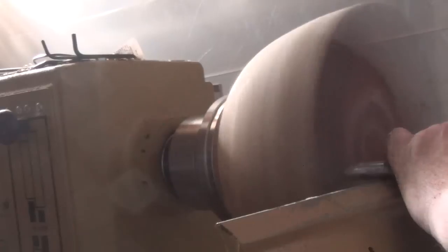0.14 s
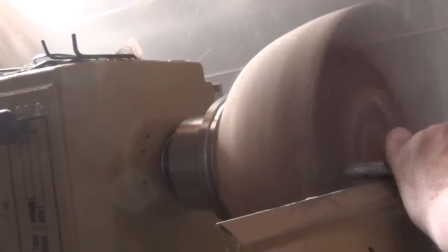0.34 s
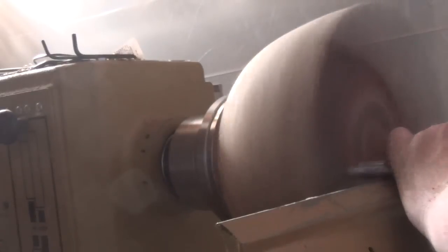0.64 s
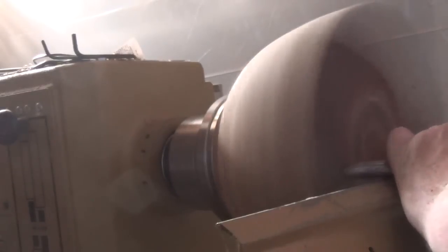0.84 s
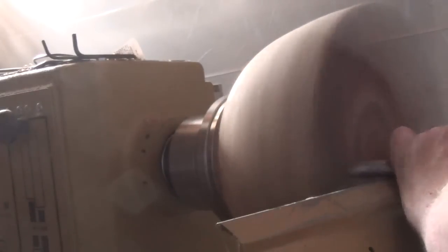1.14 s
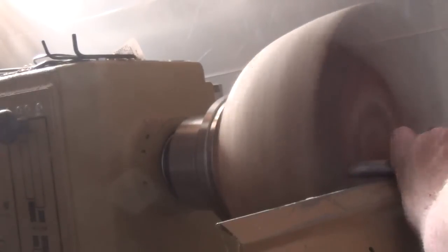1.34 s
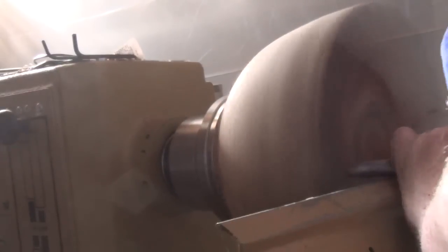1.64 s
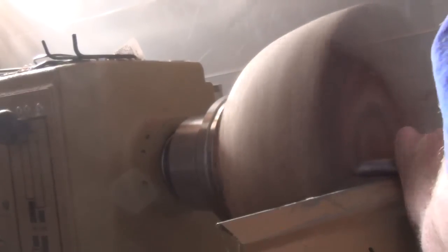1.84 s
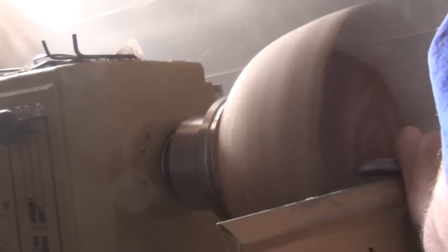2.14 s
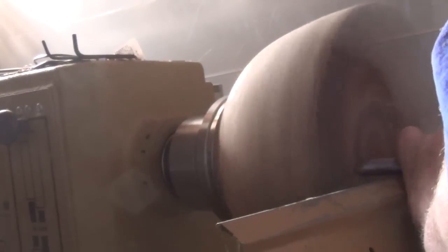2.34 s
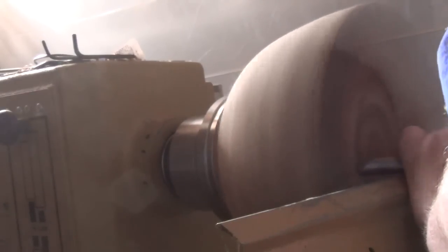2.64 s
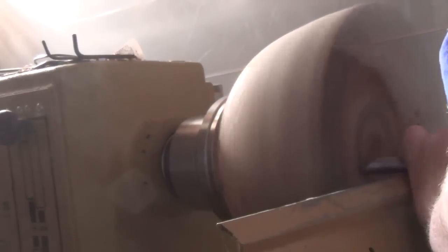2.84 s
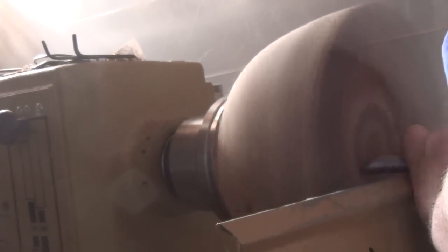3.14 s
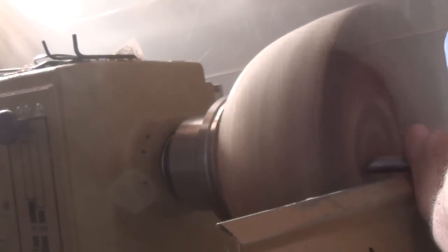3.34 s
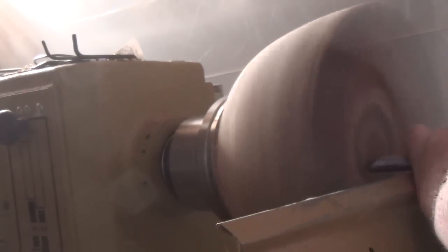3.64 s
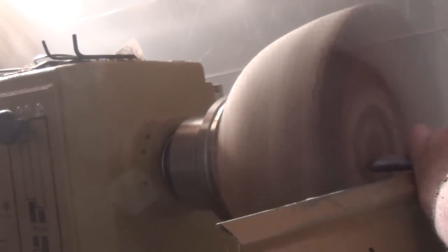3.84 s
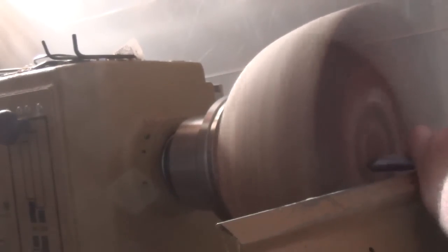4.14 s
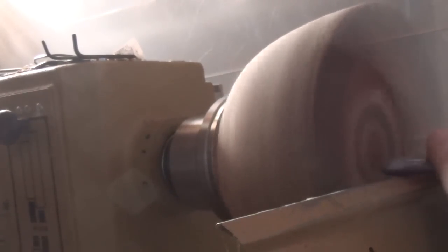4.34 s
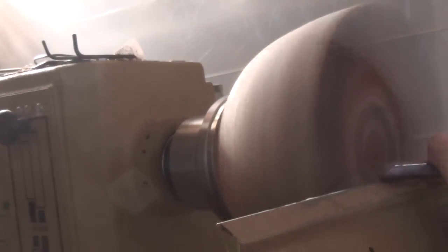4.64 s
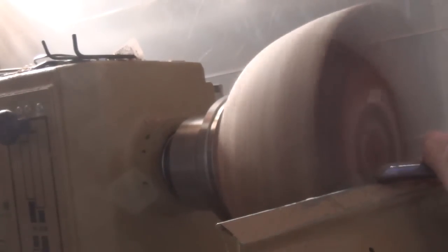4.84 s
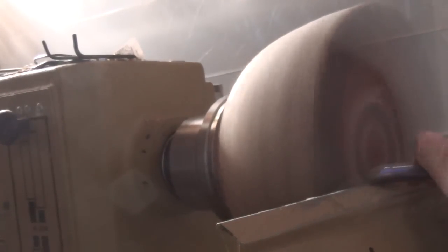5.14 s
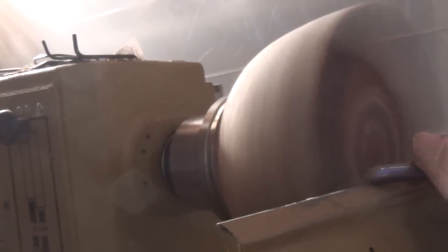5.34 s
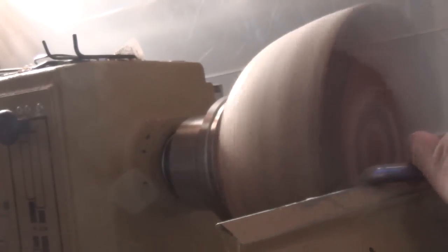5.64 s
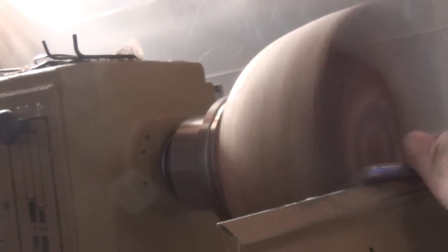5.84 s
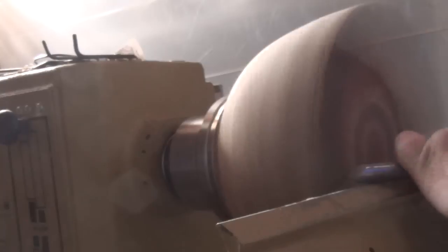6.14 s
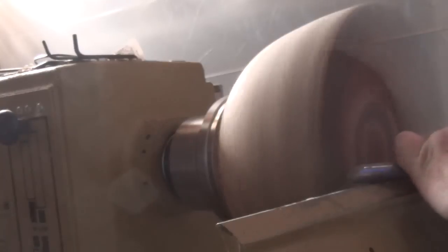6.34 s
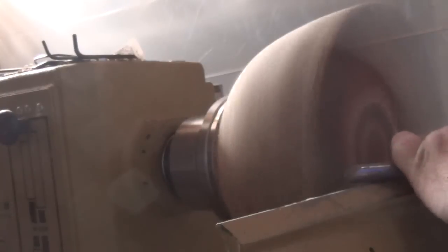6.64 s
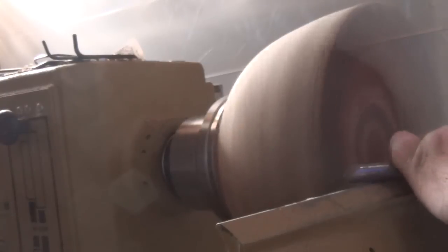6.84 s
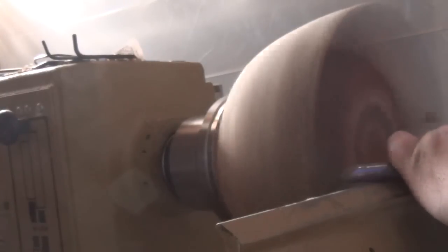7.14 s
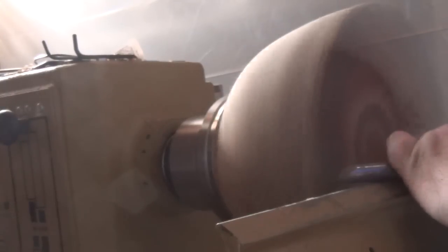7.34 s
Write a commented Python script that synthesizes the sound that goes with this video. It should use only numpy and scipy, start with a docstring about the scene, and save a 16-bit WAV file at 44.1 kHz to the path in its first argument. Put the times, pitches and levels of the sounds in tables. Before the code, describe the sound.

Fast rattling scrape of steel hollowing wood on a lathe, a pause of wavering motor hum and faint whine, then scraping again.

```python
"""A gouge hollows a wooden bowl on a lathe: twice a turn end grain bites the edge, each bite a click and a noisy tear.
Between bites shavings hiss, the bowl drums and a rumble runs below, mostly filtered noise; the tool rest buzzes,
shaken mainly by a jolt pattern that repeats each turn. After four seconds the tool lifts off and knocks lightly on
the rest, short noise bursts with a sine ring. The motor, low under the cut, is heard louder, wavering sine hum,
a comb of drive whine and noise for air, then the cut starts again."""
import sys
import numpy as np
from scipy import signal
from scipy.io import wavfile
from scipy.ndimage import uniform_filter1d

SR = 44100
rng = np.random.default_rng(int(sys.argv[2]) if len(sys.argv) > 2 else 0)


def put_to_file(sound):
    """Save the sound as 16-bit audio at rate SR, in the file named by the first command-line argument."""
    columns = np.atleast_2d(sound).T  # one column per channel
    safe = np.clip(columns, -1, 1)
    whole_steps = np.round(safe * 32767)
    wavfile.write(sys.argv[1], SR, whole_steps.astype(np.int16))


N = 329868


def gain_of(db):
    """Amplitude factor of a level in dB."""
    return 10 ** (np.asarray(db) / 20)


def unit_rms(x):
    """Scale to rms 1."""
    return x / np.sqrt(np.mean(x ** 2) + 1e-20)


def read(points, hz):
    """Read a (frequency_hz, value) table along a log frequency axis."""
    f, value = np.transpose(points)
    return np.interp(np.log(hz + 1), np.log(f + 1), value)


def curves(rows):
    """Columns of a timed table at every sample, and a soft-edged switch for where the table holds."""
    start_s, *columns = np.transpose(rows)
    t = np.arange(N) / SR
    on = 1. * (t >= start_s[0]) * (t <= start_s[-1])
    return [np.interp(t, start_s, c) for c in columns], uniform_filter1d(on, size=900)


def colour(x, db_at, size=8192):
    """Minimum-phase filter of power gain 1 from a dB shape; its peaks ring like modes."""
    hz = abs(np.fft.fftfreq(size, 1 / SR))
    log_gain = np.log(gain_of(np.maximum(db_at(hz), -100)))
    impulse = np.fft.ifft(np.exp(np.conj(signal.hilbert(log_gain)))).real[:size // 2]
    return signal.oaconvolve(x, impulse / np.linalg.norm(impulse))[:len(x)]


def band(x, lo_hz, hi_hz):
    """Butterworth band-pass."""
    return signal.sosfilt(signal.butter(2, [lo_hz, hi_hz], "band", fs=SR, output="sos"), x)


def slow(top_hz):
    """Slow random wander of rms 1: sixteen sines up to top_hz, the slower ones stronger."""
    t = np.arange(0, N, 256) / SR
    hz = top_hz * np.geomspace(.05, 1, num=16)[:, None]
    sines = np.sin(2 * np.pi * (hz * t + rng.random(hz.shape))) / np.sqrt(hz)
    return np.interp(np.arange(N) / SR, t, unit_rms(sines.sum(0)))


def fibres(per_s, spread_db, smooth):
    """Fibres snapping at random, a few of them large, over a smooth rubbing."""
    happens = rng.random(N) < per_s / SR
    size = gain_of(spread_db * np.minimum(rng.exponential(1, N), 4)) * happens
    snapping = unit_rms(size * rng.standard_normal(N))
    return unit_rms(snapping + smooth * rng.standard_normal(N))


def patches(shape, bins, frames):
    """Random field of rms 1, smoothed over frequency bins and time frames."""
    field = rng.standard_normal(shape[::-1]).T
    return unit_rms(uniform_filter1d(uniform_filter1d(field, size=bins, axis=0), size=frames, axis=1))


# single bites, mostly as the edge leaves and enters the wood; levels before later gains
# (start_s, level_db, length_ms, treble_share_db)
SINGLE_BITES = [(0.0876, -31, 19, 9), (0.335, -21, 14, 0.5), (2.023, -12, 6.9, 3.5), (2.339, -18, 9.8, 2.5),
                (2.446, -10, 8.4, -1.5), (2.55, -10.5, 5.2, -1), (3.009, -14, 8.4, 0.5),
                (3.042, -12, 5.9, 0), (3.182, -13, 16.6, -2), (3.575, -21, 4.6, -2),
                (3.6068, -12, 8.6, -1.5), (3.644, -18, 3.1, 2), (3.6746, -14, 11, -4),
                (3.6850, -21, 1.7, 1), (3.715, -18.5, 3.4, 3), (3.7455, -15, 6.4, -6),
                (3.7543, -11.5, 1.3, -3), (3.786, -12.5, 1.6, 2), (3.8156, -20, 16, -4),
                (3.823, -9, 1.45, -3), (3.888, -27, 15, -2), (3.894, -11, 2.5, -3),
                (3.958, -17.5, 7.8, 1.5), (3.963, -15.5, 3.6, -10), (4.0304, -13.5, 2, -1.5),
                (4.035, -10.5, 4.2, -8), (4.1, -15, 3, -1), (4.1055, -10.5, 2.2, -3), (4.169, -16, 5.4, -2),
                (6.343, -29.5, 2.1, 5), (6.4122, -23, 2.1, 13.5), (6.483, -18, 1.8, 7.5),
                (6.5082, -28, 2, 17), (6.5522, -13.5, 2.8, -4), (6.587, -25, 1.3, 15.5),
                (6.622, -13.5, 8.1, 1), (6.658, -16, 3, 4), (6.692, -13.5, 4.4, -1), (6.728, -21.5, 9, 4),
                (6.763, -15.5, 4.9, 1), (6.902, -17, 11, 0), (7.18, -25, 18, 10), (7.32, -13.5, 35, -5)]
# attack and decay of the bites over time; a fresh light pass snaps harder and trails off
# (start_s, snap_db, sag_db per bite length)
BITE_TOUCH = [(0, 17, 4.5), (2, 4.5, 6.5), (3.6, 7, 0.5), (4.2, 0, 2.5), (6.3, 6, 4), (6.7, 17, 20),
              (7.0, 18, 3), (7.48, 17, 13)]
SNAP_SPREAD_DB = 3  # scales the chance in each snap, less for short bites
BOWL_RISE_MS, BOWL_DB = 4.8, 1  # the bowl's low voice answers a bite late


def bites(rise_ms=0.3, fall_share=0.32, snap_ms=0.16):
    """Each bite opens with a dry snap, then tears, sags and lets go, while the bowl drums under it."""
    clumps = gain_of(2.6 * unit_rms(uniform_filter1d(rng.standard_normal(N), size=70)))  # chips break in clumps
    tearing = np.r_[clumps * fibres(9000, 2., .8), np.zeros(SR)]
    snapping = np.sign(rng.standard_normal(N + SR))
    tears, snaps = np.zeros((2, 2, N + SR))  # each has a body row and a treble row
    drumming = np.zeros(N + SR)
    ms = np.arange(SR // 20) * 1000 / SR
    rise = 1 - np.exp(-ms / rise_ms)
    touch_s, *touch = np.transpose(BITE_TOUCH)
    rows = SINGLE_BITES + steady_bites()
    chances = rng.uniform(-0.24, 1, len(rows))
    for (start_s, level_db, length_ms, treble_db), harder in zip(rows, chances):
        snap_db, sag_db = (np.interp(start_s, touch_s, c) for c in touch)
        first = round(start_s * SR)
        at = slice(first, first + len(ms))
        levels = gain_of([[level_db], [level_db + treble_db]])

        letting_go = np.exp(-np.maximum(ms - length_ms, 0) / (fall_share * length_ms))
        shape = rise * gain_of(-sag_db * ms / length_ms) * letting_go
        tear = shape * tearing[at]
        tears[:, at] += levels * tear * np.linalg.norm(shape) / (np.linalg.norm(tear) + 1e-9)

        answer = (1 - np.exp(-ms / BOWL_RISE_MS)) ** 2 * np.exp(-ms / (BOWL_RISE_MS + length_ms))
        drumming[at] += gain_of(level_db + BOWL_DB) * answer * tearing[at]

        # glancing bites are mostly snap
        snap_db = snap_db - 0.19 * length_ms + SNAP_SPREAD_DB * harder * min(length_ms / 8, 1)
        snaps[:, at] += levels * np.exp(-ms / snap_ms) * snapping[at] * gain_of(snap_db)
    body, treble = (wood(tear[:N]) + wood(snap[:N], ringing=0.09) for tear, snap in zip(tears, snaps))
    low_voice = band(wood(drumming[:N]), 695, 2620)
    return gain_of(-0.5) * band(body, 2136, 5800) + low_voice + gain_of(1.5) * band(treble, 9260, 12900)


# steady cutting, two bites a turn: (first_turn_s, last_turn_s, turn_ms, second_face_delay_ms)
PASSES = [(0.018, 3.54, 70.33, 37), (6.692, 7.47, 70.07, 36)]
# the first end-grain face of each turn, before chance: (start_s, level_db, length_ms, treble_share_db)
FIRST_FACE = [(0, -16.5, 11.5, -6), (.7, -16, 15.5, -3.5), (1.3, -16, 9.1, 3.5), (2.1, -10.5, 5, -3),
              (2.8, -16, 9.3, -1), (3.55, -16, 17, -1.5), (6.69, -16.5, 12, 1), (7.0, -19.5, 27, -0.5),
              (7.48, -13, 12, 0.5)]
# the opposite face, before chance: (start_s, level_db, length_ms, treble_share_db)
SECOND_FACE = [(0, -17.5, 14.6, 0.5), (.7, -16.5, 20, 2), (1.3, -14, 10.5, 1), (2.0, -12, 10.7, 0),
               (2.6, -13, 9.3, 2), (3.0, -12.5, 6.6, -1), (3.55, -17.5, 11, 1), (6.69, -29, 3.4, 16),
               (6.9, -19.5, 4.4, 2), (7.1, -22.5, 8.2, 8.5), (7.48, -22, 17, 6)]
# chance from bite to bite; LONG_IS_SOFT is dB of level lost per dB of length
LENGTH_SPREAD_DB, LONG_IS_SOFT, LEVEL_SPREAD_DB = 1.3, 0.54, 0.6
TREBLE_SPREAD_DB, LATE_SPREAD_MS = 0.6, 0.35


def steady_bites():
    """Each turn both faces pass the edge; a long bite is soft, and a single bite replaces the one due then."""
    turns = np.concatenate([np.arange(first, last, turn_ms / 1000) for first, last, turn_ms, _ in PASSES])
    second_ms = np.where(turns < PASSES[1][0], PASSES[0][3], PASSES[1][3])
    rows = []
    for face, after_ms in ((FIRST_FACE, 0), (SECOND_FACE, second_ms)):
        face_s, *columns = np.transpose(face)
        level_db, length_ms, treble_db = (np.interp(turns, face_s, c) for c in columns)
        longer, louder, brighter, later = np.clip(rng.standard_normal((len(turns), 4)), -2, 2).T
        longer_db = LENGTH_SPREAD_DB * longer
        rows += zip(turns + (after_ms + LATE_SPREAD_MS * later) / 1000,
                    level_db - LONG_IS_SOFT * longer_db + LEVEL_SPREAD_DB * louder,
                    length_ms * gain_of(longer_db),
                    treble_db + TREBLE_SPREAD_DB * brighter)
    single_s = np.transpose(SINGLE_BITES)[0]
    return [row for row in rows if abs(single_s - row[0]).min() > .012 and row[0] < N / SR]


# broad colour of the wood: (frequency_hz, level_db)
WOOD_COLOUR = [(300, -17), (900, -9), (2000, -8), (2600, -2), (4000, -2.5), (5000, -3), (6000, 7),
               (7500, 0), (9000, -1.5), (11000, -6.5)]
# modes of bowl and gouge, heights before scaling: (frequency_hz, width_hz, height_db above the broad colour)
WOOD_MODES = [(722, 14, 9), (795, 20, 5), (838, 20, 6), (880, 20, 5), (922, 40, 4), (1152, 40, 2),
              (1260, 45, 8.5), (1414, 30, 4), (1525, 30, 8), (1672, 50, 8), (1910, 26, 6), (2330, 70, 7),
              (2580, 40, 5), (3127, 45, 6.5), (3580, 30, 6), (3688, 30, 8), (3821, 40, 4), (3962, 40, 4),
              (4088, 40, 11), (4173, 50, 7), (4320, 70, 5), (4880, 25, 6), (5420, 80, 3), (5735, 90, 5),
              (7610, 75, 3)]
MODE_STRAY, CROSSFADES_PER_S = .006, 2.3  # frequency stray as a share; cycles of each mode set


def wood(x, ringing=.8, count=3):
    """Bowl and gouge ring under the driven edge; randomly varied mode sets crossfade, so the ringing wanders."""
    turn = np.pi * CROSSFADES_PER_S * np.arange(len(x)) / SR + rng.random()
    out = 0
    for k, (shift, share) in enumerate(rng.uniform(-0.93, 1, (count, 2, len(WOOD_MODES)))):
        modes = [(f * (1 + MODE_STRAY * a), width, db * (.9 + .4 * b))
                 for (f, width, db), a, b in zip(WOOD_MODES, shift, share)]

        def shape_db(hz):
            peaks = sum(db / (1 + (2 * (hz - f) / width) ** 2) for f, width, db in modes)
            return read(WOOD_COLOUR, hz) + ringing * peaks

        fade = np.cos(turn + np.pi * k / count) ** 2 * 2 / count * np.sqrt(2)
        out = out + colour(x * fade, shape_db)
    return out


# the running cut, one list per pass, levels before later gains
# (start_s, hiss_db, drumming_db, rest_buzz_db, rumble_db)
CUT_LEVELS = [
    [(0.0, -23, -25.5, -40, -44), (0.7, -25.5, -31.5, -37, -42), (1.23, -25, -27, -36, -46),
     (1.35, -25, -31.5, -42.5, -47), (1.7, -23.5, -23, -38, -41), (2.2, -24, -31, -45.5, -43),
     (2.5, -22.5, -36.5, -47.5, -49), (2.75, -24, -23, -40, -44.5), (3.3, -26.5, -34, -40.5, -46.5),
     (3.68, -31, -28.5, -40.5, -46), (3.98, -34.5, -35.5, -40.5, -45), (4.19, -44, -50, -49, -52)],
    [(6.5, -64, -64, -56, -58), (6.584, -34.5, -42, -67, -50), (6.764, -23, -41.5, -36.5, -45.5),
     (7.034, -24.5, -28.5, -39.5, -40), (7.48, -20, -34, -30.5, -37.5)],
]
# hiss band for each half of a turn: (low_hz, high_hz, first_pass_db, second_pass_db)
HALF_TURN_RING = [(5500, 6050, -8, 6), (2900, 3300, -20, 2)]
# fall of the hiss over each turn: (first_pass_db, second_pass_db)
HISS_FADES = (7.5, 3.5)


def shavings():
    """Shavings hiss through the wood, fading until the next turn; each half turn has its own ring."""
    hiss = unit_rms(wood(fibres(8000, 2.6, 0.5) * gain_of(2. * slow(40))))
    out, t = np.zeros(N), np.arange(N) / SR
    for k, (rows, one_pass, fade_db) in enumerate(zip(CUT_LEVELS, PASSES, HISS_FADES)):
        (hiss_db, *_), on = curves(rows)
        first, _, turn_ms, after_ms = one_pass
        turn = (t - first) * 1000 / turn_ms % 1
        half = uniform_filter1d(1. * (turn < after_ms / turn_ms), size=90)
        rings = sum(gain_of(db[k]) * share * band(hiss, lo, hi)
                    for (lo, hi, *db), share in zip(HALF_TURN_RING, (half, 1 - half)))
        fading_db = uniform_filter1d(fade_db * (turn - .5), size=60)
        out += on * gain_of(hiss_db - fading_db) * (hiss + rings)
    return out * level_between_bites(fade_db=3., lag_ms=0)


DIP_DB, DIP_MS = 8, 2.5  # dip just before each bite and its time constant


def level_between_bites(fade_db, lag_ms):
    """The level sinks after each face and dips briefly before the next bite."""
    t, db = np.arange(N) / SR, np.zeros(N)
    for (first, _, turn_ms, after_ms), rows in zip(PASSES, CUT_LEVELS):
        ms = ((t - first) * 1000 - lag_ms) % turn_ms
        since, until = np.where(ms < after_ms, [ms, after_ms - ms], [ms - after_ms, turn_ms - ms])
        during = (t >= rows[0][0]) * (t <= rows[-1][0])
        sinking_db = fade_db * (.5 - since / (since + until))
        db += during * (sinking_db - DIP_DB * np.exp(-until / DIP_MS))
    return gain_of(uniform_filter1d(db, size=30))


# the grain's colour as the edge travels: (start_s, hollow_db, chesty_db, bright_db, chesty_hz)
EDGE_TONE = [(0, -3, 3.5, -1.5, 3750), (0.599, -2, -1.5, -3, 3700), (0.898, -1, 3, -1, 4130),
             (1.806, -5, 5, -3.5, 3880), (3.0, -0.5, 3.5, -6, 4000), (3.5, -1, 2.5, -5, 3630),
             (4.2, 1.5, -2.5, -2.5, 3930), (6.4, -7.5, 3, 10, 3850), (6.6, -1, -5, -2.5, 3780),
             (6.8, 1.5, -2, -5, 3800), (7.2, -3, 1.5, -4.5, 3800), (7.48, -1.5, -6, -5, 3740)]


def shifting(x, patchy_db=2.0):
    """The grain changes under the edge, so the ringing moves from band to band."""
    hz, t, z = signal.stft(x, SR, nperseg=256, noverlap=192)
    tone_s, *columns = np.transpose(EDGE_TONE)
    *levels_db, chesty_hz = (np.interp(t, tone_s, c) for c in columns)
    db = patchy_db * patches(z.shape, bins=4, frames=16)
    for (centre_hz, width_hz), level_db in zip([(2700, 700), (chesty_hz, 520), (5900, 700)], levels_db):
        db += np.exp(-((hz[:, None] - centre_hz) / width_hz) ** 2) * level_db
    return signal.istft(z * gain_of(db), SR, nperseg=256, noverlap=192)[1][:N]


def bowl_drumming():
    """Snapping fibres drive the bowl's low modes, the level pulsing between bites."""
    drive = fibres(1500, 5.1, 1.0) * gain_of(2 * slow(15))
    drum = band(wood(drive, ringing=1.53), 704, 2940)
    return unit_rms(drum * level_between_bites(fade_db=4.5, lag_ms=2.7))


# resonances of the tool rest: (frequency_hz, width_hz, level_db)
REST_MODES = [(216, 25, -3.5), (371.4, 15.7, 3), (413.5, 24, 6), (429.5, 6.9, 4.5), (462.4, 11.6, 3),
              (537, 23, -3.5), (724, 10.5, 2)]
ONCE_A_TURN = .8  # share of the shaking power that repeats with the turn


def rest_buzz():
    """The tool rest's narrow modes are shaken partly at random, mostly alike on every turn."""
    noise = unit_rms(band(rng.standard_normal(N), 20, 1030))
    shake = noise * (1 - ONCE_A_TURN) ** .5 + same_each_turn() * ONCE_A_TURN ** .5

    def shape_db(hz):
        power = sum(gain_of(2 * db) / (1 + (2 * (hz - f) / width) ** 2) ** 2 for f, width, db in REST_MODES)
        return 10 * np.log10(power)

    return unit_rms(colour(shake, shape_db, size=32768))


def same_each_turn(count=130):
    """A jolt pattern of random-phase harmonics that returns with every turn of the bowl."""
    t = np.arange(N) / SR
    turns = t * 1000 / np.where(t < PASSES[1][0] - 1, PASSES[0][2], PASSES[1][2])
    place = np.arange(2048) / 2048
    harmonics = np.arange(1, count)[:, None]
    pattern = np.cos(2 * np.pi * (harmonics * place + rng.random((count - 1, 1)))).sum(0)
    return unit_rms(np.interp(turns % 1, place, pattern, period=1))


def bed_rumble():
    """The shaken bed gives a low noise band that slowly wanders in level."""
    rumble = band(band(rng.standard_normal(N), 66, 313), 68, 320)
    return unit_rms(rumble) * gain_of(1.6 * slow(8))


def cutting():
    """The cut drums the bowl and shakes rest and bed, each at its own level in CUT_LEVELS."""
    drum, buzz, rumble = bowl_drumming(), rest_buzz(), bed_rumble()
    out = np.zeros(N)
    for rows in CUT_LEVELS:
        (_, drum_db, buzz_db, rumble_db), on = curves(rows)
        out += on * (gain_of(drum_db) * drum + gain_of(buzz_db) * buzz + gain_of(rumble_db) * rumble)
    return out


# the gouge touching the rest, ring and tick relative to the knock
# (start_s, level_db, pitch_hz, ring_db, tick_db)
REST_TAPS = [(4.293, -51, 6300, 3, -12), (4.341, -44, 1245, 12, -20), (4.385, -46, 2300, -8, -20),
             (4.447, -49, 2600, -10, -20), (4.549, -46, 1790, -9, -14), (4.560, -43, 1756, -3, -14),
             (4.572, -41, 1786, -5, 2)]


def taps():
    """Short dull knocks of steel on the rest: a noise band, a bright tick and a sine ring, all dying fast."""
    out, t = np.zeros(N), np.arange(SR // 20) / SR
    noises = rng.standard_normal((len(REST_TAPS), len(t)))
    for (start_s, level_db, pitch_hz, ring_db, tick_db), noise in zip(REST_TAPS, noises):
        dull = unit_rms(band(noise, pitch_hz * 0.54, pitch_hz * 2.4))
        tick = gain_of(tick_db - 60 * t / 0.07) * wood(noise)
        ring = gain_of(ring_db) * np.sin(2 * np.pi * pitch_hz * t)
        envelope = gain_of(level_db - 60 * t / 0.055) * (1 - np.exp(-t / 0.001))
        out[round(start_s * SR):][:len(t)] += envelope * (dull + tick + ring)
    return out


# hum lines, levels relative: (frequency_hz, level_db, wavering_db)
HUM_LINES = [(28.6, -33, 4), (57.5, -26, 3), (169.5, -10, 3), (200.2, 0, 1.5), (251, -16, 3), (643, -23, 1),
             (706.9, -8, .8), (857.4, -13, 1), (923.9, -11, 1)]
# hum lines that throb: {frequency_hz: (throbs_per_s, loudest_s, depth 0-1)}
THROBS = {706.9: (2.4, 5.02, .75), 923.9: (3.35, 4.46, .9)}


def motor_hum():
    """Sine lines that share a slight pitch drift, each wavering in level; some also throb."""
    t = np.arange(N) / SR
    cycles = np.cumsum(1 + 0.0005 * slow(6)) / SR
    throb = {hz: 1 - depth * np.sin(np.pi * per_s * (t - loudest_s)) ** 2
             for hz, (per_s, loudest_s, depth) in THROBS.items()}
    hum = np.zeros(N)
    for hz, level_db, wavering_db in HUM_LINES:
        level = throb.get(hz, 1) * gain_of(level_db + wavering_db * slow(8.8))
        hum += level * np.sin(2 * np.pi * (hz * cycles + rng.random()))
    return hum


# sidebands of the drive's switching tone, before later gains: (steps from the strongest, level_db)
WHINE_COMB = [(-24, -70.2), (-23, -70.6), (-22, -70.8), (-21, -64.9), (-20, -58.4), (-19, -58.4),
              (-18, -59.1), (-17, -59.9), (-16, -55.2), (-15, -62.6), (-14, -65.2), (-13, -58.3),
              (-12, -53.2), (-11, -54.6), (-10, -52.0), (-9, -54.3), (-8, -52.6), (-7, -43.9), (-6, -50.6),
              (-5, -50.0), (-4, -51.3), (-3, -50.8), (-2, -64.4), (-1, -48.6), (0, -40.5), (1, -58.4),
              (2, -52.2), (3, -44.0), (4, -48.8), (5, -51.8)]
WHINE_HZ, STEP_HZ = 10607.6, 71.47  # the strongest tone and the even spacing


def drive_whine():
    """The drive's switching tone and its evenly spaced sidebands, wavering in level and phase."""
    t = np.arange(N) / SR
    whine = np.zeros(N)
    for step, level_db in WHINE_COMB:
        cycles = (WHINE_HZ + step * STEP_HZ) * t + 0.078 * slow(25) + rng.random()
        whine += gain_of(level_db + 1.5 * slow(12)) * np.sin(2 * np.pi * cycles)
    return whine


# relative spectrum of the air noise: (frequency_hz, density_db per Hz)
AIR_SPECTRUM = [(25, -33), (50, -33), (90, -10), (180, -7.5), (311, -19), (422, -11), (600, -21),
                (1000, -20.5), (2500, -31.5), (4050, -32.5), (4270, -27), (4480, -35.5), (4900, -40.5),
                (5700, -25.5), (8400, -32), (10800, -22)]


def motor_air():
    """Broad coloured noise with a slowly wandering level."""
    air = colour(rng.standard_normal(N), lambda hz: read(AIR_SPECTRUM, hz))
    return unit_rms(air) * gain_of(1 * slow(10))


# heard level of the motor, low under the cut, rising once the tool is off: (start_s, level_db)
MOTOR_LEVEL = [(0, -5), (2, -6.5), (2.8, -28), (3.5, -4), (4.0, -8.5), (4.3, -2.5), (5.1, -1), (6.3, 2),
               (6.8, -3), (7.48, -5)]
HUM_DB, AIR_DB = -38.5, -36.5  # offsets added to the motor level
WHINE_FOLLOWS, AIR_FOLLOWS = 0.8, 0.72  # dB per dB of motor level


def motor():
    """Hum, drive whine and air noise follow one level curve, the hum the most."""
    (level_db,), _ = curves(MOTOR_LEVEL)
    hum = gain_of(HUM_DB + level_db) * motor_hum()
    whine = gain_of(WHINE_FOLLOWS * level_db) * drive_whine()
    air = gain_of(AIR_DB + AIR_FOLLOWS * level_db) * motor_air()
    return np.sqrt(2) * (hum + whine) + air


def tail(t60_at):
    """A dense random tail of energy 1, each band dying at its own speed."""
    hz, t, z = signal.stft(rng.standard_normal(SR // 2), SR, nperseg=128)
    decay = gain_of(-60 * t / t60_at(hz)[:, None])
    echo = signal.istft(z * decay, SR, nperseg=128)[1]
    return echo / np.linalg.norm(echo)


# reverberation of the workshop: (frequency_hz, t60_s)
SHOP_T60 = [(300, .8), (1500, 0.33), (3000, .17), (4200, 0.14), (6000, .075), (10000, 0.055)]


def shop(x, count=3):
    """The workshop answers; the echo crossfades between three random tails so no one colour stays."""
    turn = np.pi * 3.1 * np.arange(N) / SR
    out = np.zeros(N)
    for k in range(count):
        sent = x * np.cos(turn + np.pi * k / count) ** 2
        out += signal.oaconvolve(sent, tail(lambda hz: read(SHOP_T60, hz)))[:N]
    return out


# scattered stereo part: (frequency_hz, side_over_mid_db)
SIDE_LEVELS = [(60, -5), (140, -23), (350, -11.5), (840, -8), (2020, -20), (3500, -19.5), (5500, -24.5),
               (11700, -8.5)]
# fixed stereo balance: (frequency_hz, left_over_right_db)
STEREO_LEAN = [(100, 0), (180, 6), (250, -9.5), (330, 9.5), (450, 2.5), (700, -0.5), (1200, 0.5)]
# moving stereo balance: (start_s, left_over_right_db)
STEREO_PAN = [(0.0, -1), (2.75, -1.5), (3.1, -3), (4.2, -1), (5.9, 0), (7.48, -1)]


def stereo(mid):
    """Left and right differ by scattered sound of drifting phase, a fixed lean and a moving pan."""
    hz, _, z = signal.stft(mid, SR, nperseg=512, noverlap=384)
    real, imaginary = (patches(z.shape, bins=2, frames=12) for _ in range(2))
    scatter = (real + 1j * imaginary) / np.sqrt(2) * gain_of(read(SIDE_LEVELS, hz))[:, None]
    lean = np.tanh(read(STEREO_LEAN, hz) * np.log(10) / 40)[:, None]  # side share for a left-right dB
    side = signal.istft(z * (scatter + lean), SR, nperseg=512, noverlap=384)[1][:N]
    (pan_db,), _ = curves(STEREO_PAN)
    return np.array([gain_of(pan_db / 2) * (mid + side), gain_of(-pan_db / 2) * (mid - side)])


def scene():
    """Bites and taps with their echo, shavings, the shaken bowl and rest, and the motor, spread in stereo."""
    tool = bites() + taps()
    edge = shifting(tool + gain_of(-4.5) * shop(tool) + shavings())
    return stereo(edge + cutting() + motor())


EDGE_HZ = 11020  # top of the band


def record(dry, ceiling=.9):
    """The input stage rounds the highest peaks; then the band limit."""
    rounded = ceiling * np.tanh(dry / ceiling)
    low_pass = signal.firwin(1401, EDGE_HZ, window=("kaiser", 8), fs=SR)
    return signal.oaconvolve(rounded, low_pass[None], "same")


dry = scene()
out = record(dry)
put_to_file(out)
```